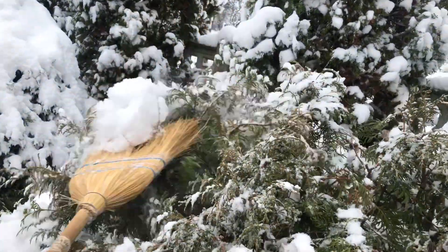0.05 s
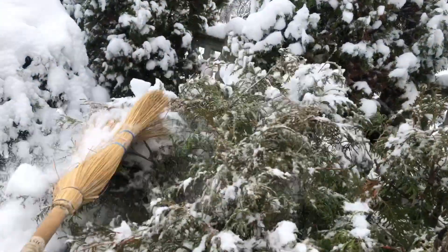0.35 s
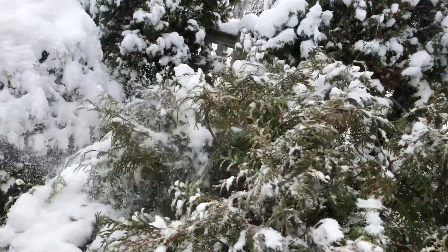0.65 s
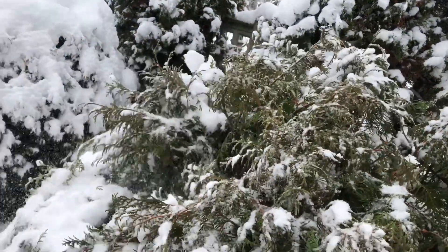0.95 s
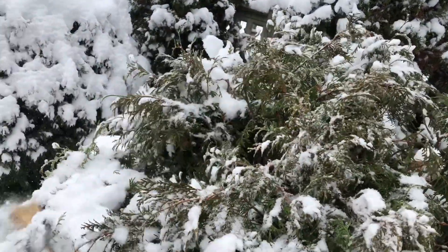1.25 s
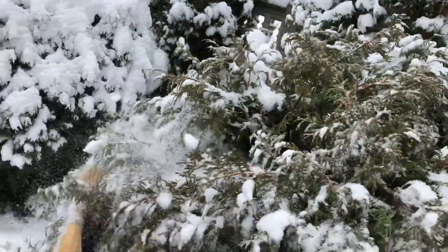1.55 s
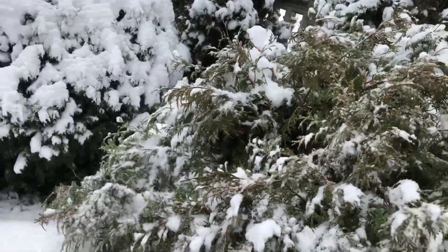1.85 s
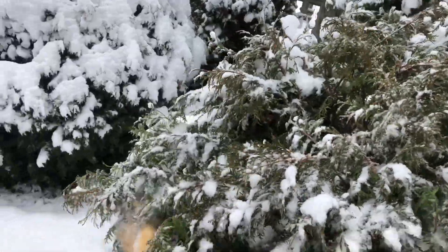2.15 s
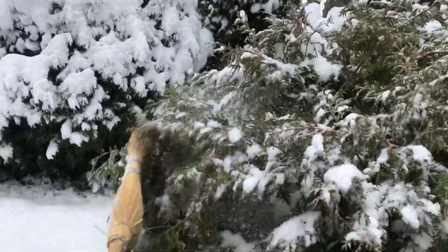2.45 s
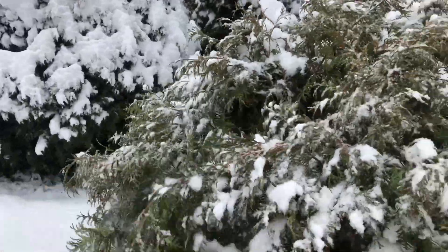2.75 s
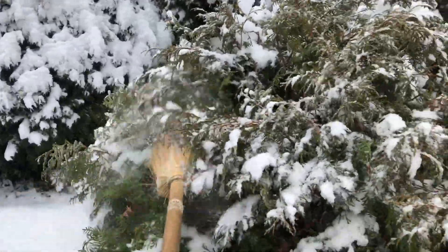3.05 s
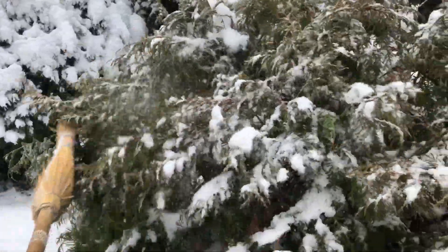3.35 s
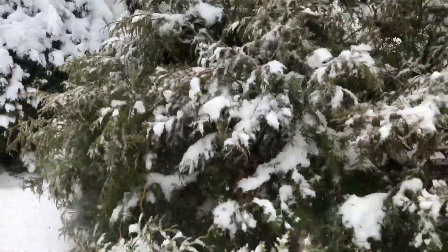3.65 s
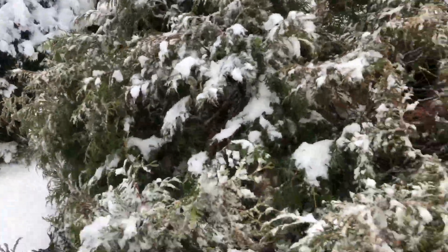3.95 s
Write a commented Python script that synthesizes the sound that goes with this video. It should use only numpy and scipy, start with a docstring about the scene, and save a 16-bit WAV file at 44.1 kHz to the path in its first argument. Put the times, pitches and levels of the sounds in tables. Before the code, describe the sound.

A straw broom swats a snowy shrub four times, then wind buffets the microphone.

```python
"""Broom on a snowy shrub

Close up in a quiet, snow-deadened garden, a straw broom swats an evergreen shrub four times.
Each swat is a burst of straw crackle; the sprays rustle, swing back and shed powder, twigs tick
and stems knock. Near the end a gust buffets the microphone. Soft air and a far hum lie behind."""
import sys
import numpy as np
from scipy import signal
from scipy.io import wavfile
from scipy.ndimage import uniform_filter1d

SR = 44100
rng = np.random.default_rng(int(sys.argv[2]) if len(sys.argv) > 2 else 0)


def master_out(mix):
    """Clip the mix to full scale and print it as 16-bit PCM to the path in sys.argv[1]."""
    frames = np.transpose(np.atleast_2d(mix))
    ceiling = np.clip(frames, -1, 1)
    pcm = np.round(ceiling * 32767).astype(np.int16)
    wavfile.write(sys.argv[1], SR, pcm)


N = 176400
T = np.arange(N) / SR

# start_s, attack_s, hold_s, straw_db, straw_fade_db_per_s, foliage_db, foliage_fade_db_per_s
BROOM_SWATS = [(-.012, 0.0048, 0.0089, -40, 265, -46.5, 72), (1.251, 0.017, 0.03, -43, 274, -51, 35),
               (2.136, 0.0071, 0.054, -45.5, 171, -54, 69), (2.948, 0.026, 0.068, -44, 120, -62, 84)]
# Boughs swinging back: peak_s, level_db, rise_db_per_s, fall_db_per_s
BOUGH_SWINGS = [(.1, -51, 300, 196), (.465, -49.5, 84, 154), (0.509, -48, 430, 300), (1.615, -53, 232, 134),
                (1.675, -52.5, 200, 290), (2.31, -50, 110, 91), (2.52, -57, 123, 165),
                (3.125, -50, 160, 174), (3.45, -58, 47, 193)]
# Fine snow sifting through the needles: time_s, level_db
POWDER_LEVELS = [(0, -51), (.3, -66.5), (.65, -66.5), (1.23, -68), (1.4, -62), (1.55, -66.5), (1.82, -58),
                 (2.0, -62.5), (2.4, -60.5), (2.75, -60.5), (2.93, -64.5), (3.33, -60.5), (3.65, -63),
                 (3.9, -66.5), (4, -71)]
# Twigs and straws snapping: start_s, level_db, pitch_hz, length_s
TWIG_TICKS = [(.851, -49.5, 2820, 0.0024), (.869, -57.5, 5370, 0.0034), (1.089, -55.5, 5700, 0.003),
              (1.192, -56.5, 6000, 0.003), (1.272, -35.5, 4470, 0.0023), (1.283, -43, 3260, 0.011),
              (1.981, -56.5, 6000, 0.0022), (2.147, -43.5, 3470, 0.0065), (2.159, -41.5, 2800, 0.0032),
              (2.972, -38.5, 3230, 0.0044), (2.972, -43, 7250, 0.0046), (3.776, -60, 7000, 0.0014),
              (3.897, -60, 3440, 0.0072)]
# Broom on stems, and falling clumps: start_s, level_db, pitch_hz, length_s
DULL_KNOCKS = [(0, -49, 500, 0.011), (.022, -42.5, 248, 0.007), (.025, -47.5, 87, 0.017),
               (.085, -59, 1050, 0.033), (.243, -55.5, 166, 0.012), (.72, -59, 59.7, 0.023),
               (1.085, -62.5, 1160, 0.03), (1.305, -55, 220, 0.02), (1.306, -54, 910, 0.018),
               (2.146, -46.5, 1160, 0.0091), (2.41, -57, 68.3, 0.087), (2.692, -52.5, 236, 0.018),
               (2.693, -51, 714, 0.0037), (2.973, -38.5, 1040, 0.0035)]
# Air flow over the microphone: time_s, level_db
GUST_LEVELS = [(3.08, -83), (3.16, -42), (3.23, -29), (3.3, -25), (3.34, -42.5), (3.385, -36.5),
               (3.42, -56), (3.512, -59), (3.53, -30), (3.59, -36.5), (3.69, -38.5), (3.77, -45.5),
               (3.83, -50), (3.89, -40.5), (3.95, -49.5), (4, -61)]
# Eddies on the microphone port: peak_s, level_db, half_length_s, top_hz, spill_relative_db
MIC_EDDIES = [(3.216, -29, 0.0052, 447, -35), (3.232, -20.5, 0.0055, 180, -32),
              (3.251, -21.5, 0.0047, 366, -13), (3.279, -17, 0.003, 302, -34),
              (3.289, -15, 0.0024, 458, -28.5), (3.303, -23, 0.0041, 397, -42),
              (3.524, -28, 0.0044, 290, -35), (3.532, -24, 0.0036, 300, -11),
              (3.539, -19, 0.0088, 186, -32), (3.541, -26, 0.0038, 494, -15.5),
              (3.651, -26, 0.0042, 264, -29), (3.691, -25.5, 0.0079, 182, -12),
              (3.742, -30, 0.0036, 253, -36)]
# Spectral shape of each source: frequency_hz, relative_density_db
STRAW_SPECTRUM = [(100, -6.5), (500, -11.5), (900, -6), (1600, -1.5), (2800, 0.5), (4800, -4), (7000, -2),
                  (11000, -8), (16000, -11.5)]
FOLIAGE_SPECTRUM = [(100, -6), (600, -7), (1200, -4), (2800, -0.5), (4800, -4), (7000, -4.5), (11000, -11),
                    (16000, -14.5)]
SNOW_SPECTRUM = [(200, -11), (1000, -3), (2500, -0.5), (4500, -0.5), (7000, -1), (11000, -4), (16000, -8.5)]
WIND_SPECTRUM = [(25, -18), (40, 0), (55, 4), (90, 1.5), (160, 3), (240, -7), (350, -20), (550, -45),
                 (900, -37), (2000, -76)]
AIR_SPECTRUM = [(25, -18), (55, 3.5), (120, 0), (250, -1), (450, -2), (800, -8.5), (1500, -17),
                (4000, -32.5), (16000, -32)]

GRAINS_PER_S = 5000
EDDY_SPAN, SPILL_SPAN = 2.84, 2.21   # frequency ratios below and above top_hz
AIR_DB, FAR_HUM_HZ, FAR_HUM_DB = -66, 1162, -77.5


def broom():
    """Straws rake across the sprays, close to the microphone."""
    push = sum(from_db(db) * stroke(start, attack, hold, fade)
               for start, attack, hold, db, fade, _, _ in BROOM_SWATS)
    straws = crackle(GRAINS_PER_S, spread_db=2.5, hiss=0.46)
    return push * colour(straws, STRAW_SPECTRUM, flicker_db=0.0)


def foliage():
    """Sprays rub together after each swat and again as the boughs swing back."""
    power = sum((from_db(db) * stroke(start, attack, hold, fade)) ** 2
                for start, attack, hold, _, _, db, fade in BROOM_SWATS)
    for peak, db, rise, fall in BOUGH_SWINGS:
        power += from_db(db - np.maximum((peak - T) * rise, (T - peak) * fall)) ** 2
    rubbing = crackle(GRAINS_PER_S, spread_db=4.5, hiss=1.0)
    return np.sqrt(power) * colour(rubbing, FOLIAGE_SPECTRUM, flicker_db=1.45)


def powder():
    """Loose snow patters down through the shrub."""
    grains = crackle(per_s=1500, spread_db=3.8, hiss=1.46)
    return curve(POWDER_LEVELS) * colour(grains, SNOW_SPECTRUM, flicker_db=2.0)


def contacts(rows, octaves):
    """Snaps or knocks in the shrub: heavily damped bursts, each around its own pitch."""
    out = np.zeros(N)
    edge_ratio = 2 ** (octaves / 2)
    for start, db, hz, length in rows:
        ring = band(rng.standard_normal(N), hz / edge_ratio, hz * edge_ratio, order=1)
        ring = band(steady(ring, samples=400), hz / 3, hz * 3)
        attack = np.clip(5 * (T - start) / length, 0, 1)
        out += from_db(db) * ring * attack * bell(start, length)
    return out


def wind():
    """A gust rumbles on the microphone port; eddies thump and flick brightly at their crest."""
    flow = colour(rng.standard_normal((2, N)), WIND_SPECTRUM, flicker_db=2.0)
    out = curve(GUST_LEVELS) * steady(flow, samples=1100)
    for peak, db, half_length, top_hz, spill_db in MIC_EDDIES:
        body = band(rng.standard_normal(N), top_hz / EDDY_SPAN, top_hz, order=4)
        spill = band(rng.standard_normal(N), top_hz, SPILL_SPAN * top_hz, order=3)
        thump = steady(body, samples=300) * bell(peak, half_length)
        flick = steady(spill, samples=120) * bell(peak, half_length_s=0.0018)
        out += from_db(db) * (thump + from_db(spill_db) * flick)
    return band(out, low_hz=39.0, high_hz=1890, order=3)


def garden():
    """Soft outdoor air all round, and a faint hum wavering in the distance."""
    air = colour(rng.standard_normal((2, N)), AIR_SPECTRUM, flicker_db=1.05)
    hum_gain = from_db(FAR_HUM_DB + 2 * drift(rate_hz=3.4))
    hum = band(rng.standard_normal(N), FAR_HUM_HZ - 20, FAR_HUM_HZ + 20, order=1)
    return from_db(AIR_DB) * air + hum_gain * unit_rms(hum)


def crackle(per_s, spread_db, hiss):
    """Two streams of tiny contacts of uneven size over a blur of finer ones."""
    hits = rng.random(N) < per_s / SR
    sizes = from_db(spread_db * np.minimum(rng.exponential(1, N), 4))
    clicks = hits * sizes * rng.choice([-1, 1], (2, N))
    return unit_rms(clicks) + hiss * rng.standard_normal((2, N))


def colour(pair, spectrum, flicker_db):
    """Deal two streams in turn to half-octave bands, each with its own level and flicker."""
    hz, db = np.transpose(spectrum)
    edges_hz = 24 * 2 ** np.arange(0, 9.6, .5)
    out = 0
    for k, (low, high) in enumerate(zip(edges_hz, edges_hz[1:])):
        level_db = np.interp(np.log(low * high) / 2, np.log(hz), db)
        gain = from_db(level_db + flicker_db * drift(rate_hz=27))
        out += gain * band(pair[k % 2], low, high, order=3)
    return unit_rms(out)


def stroke(start_s, attack_s, hold_s, fade_db_per_s):
    """Linear attack, hold, then a steady fade."""
    age = T - start_s
    fade_db = fade_db_per_s * np.maximum(age - attack_s - hold_s, 0)
    return np.clip(age / attack_s, 0, 1) * from_db(-fade_db)


def bell(peak_s, half_length_s):
    """Gaussian swell and fall around one moment."""
    return np.exp(-np.minimum(((T - peak_s) / half_length_s) ** 2 / 2, 50))


def curve(rows):
    """Gain through (time_s, level_db) points."""
    return from_db(np.interp(T, *np.transpose(rows)))


def drift(rate_hz):
    """Slow random wander with spread 1."""
    hop, settle = 40, 2000
    pole = np.exp(-2 * np.pi * rate_hz * hop / SR)
    noise = rng.standard_normal(N // hop + settle + 2)
    slow = signal.lfilter([1], [1, -2 * pole, pole * pole], noise)[settle:]
    return np.interp(np.arange(N) / hop, np.arange(len(slow)), unit_rms(slow))


def steady(x, samples):
    """Even out the level of a noise over a sliding window."""
    power = uniform_filter1d(abs(signal.hilbert(x)) ** 2, samples) / 2
    return x / np.sqrt(power + 1e-12)


def band(x, low_hz, high_hz, order=2):
    """Butterworth band-pass."""
    edges_hz = [max(low_hz, 10), min(high_hz, .47 * SR)]
    return signal.sosfilt(signal.butter(order, edges_hz, "band", fs=SR, output="sos"), x)


def from_db(db):
    """Decibels to gain."""
    return 10 ** (np.asarray(db) / 20)


def unit_rms(x):
    """Scale to unit power."""
    return x / np.sqrt(np.mean(x ** 2) + 1e-20)


def scene():
    """One microphone beside the shrub; the snow swallows all echoes."""
    shrub = broom() + foliage() + powder()
    ticks = contacts(TWIG_TICKS, octaves=0.77)
    knocks = contacts(DULL_KNOCKS, octaves=0.33)
    return (shrub + ticks + knocks + wind() + garden())[None]


def record(dry):
    """The recorder cuts the top treble steeply."""
    cutoff_hz = 15900
    return signal.sosfilt(signal.ellip(12, .2, 80, cutoff_hz, fs=SR, output="sos"), dry)


dry = scene()
out = record(dry)
master_out(out)
```